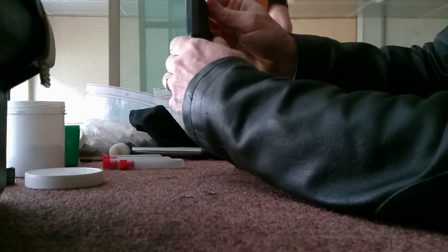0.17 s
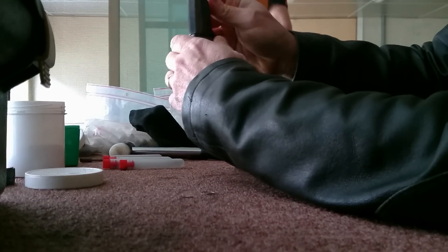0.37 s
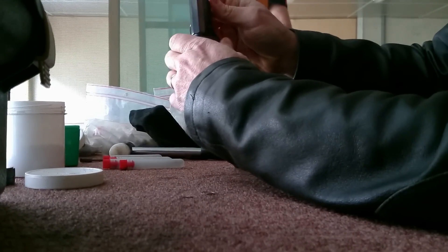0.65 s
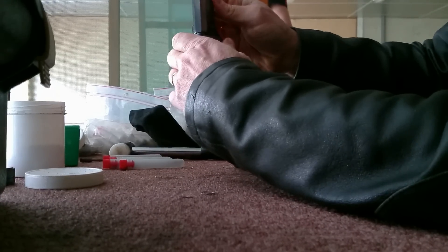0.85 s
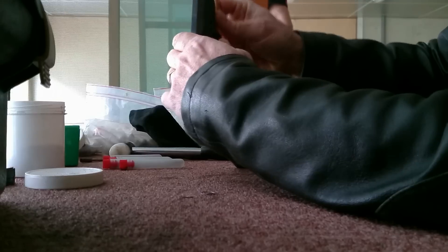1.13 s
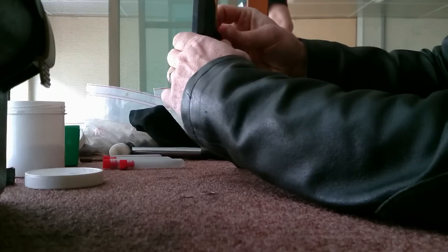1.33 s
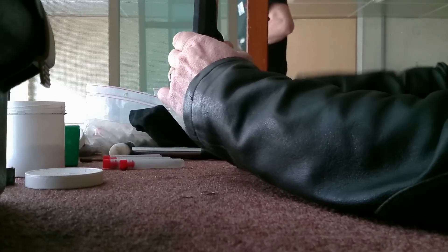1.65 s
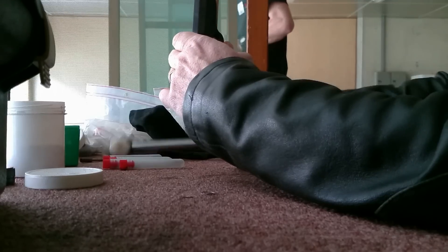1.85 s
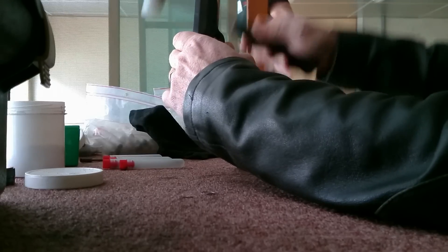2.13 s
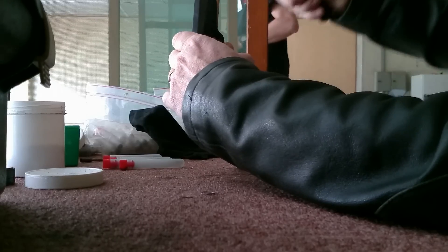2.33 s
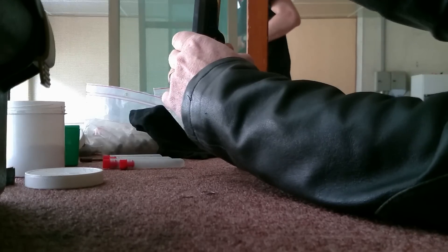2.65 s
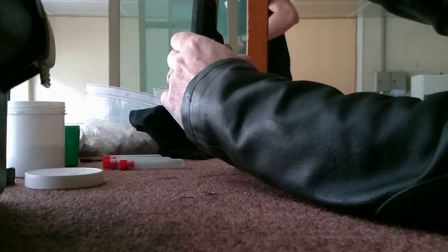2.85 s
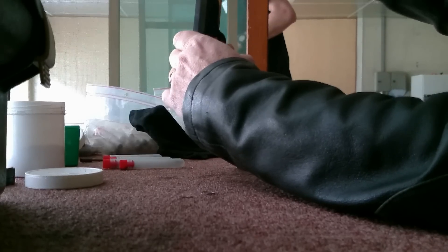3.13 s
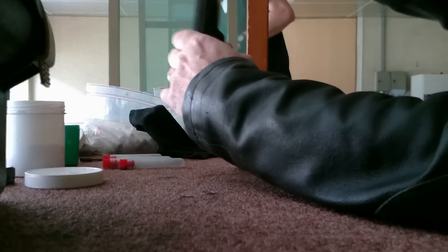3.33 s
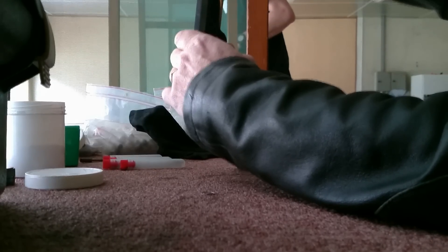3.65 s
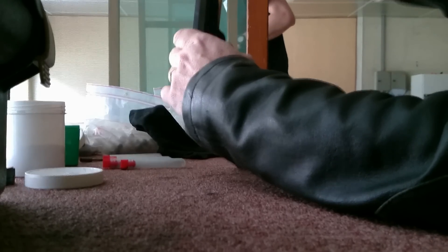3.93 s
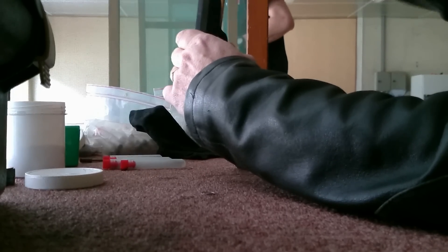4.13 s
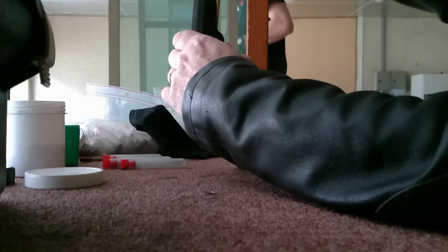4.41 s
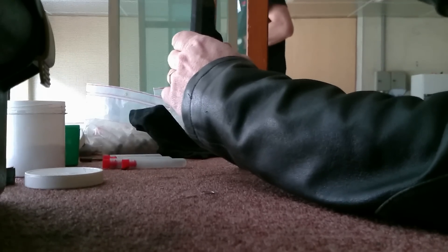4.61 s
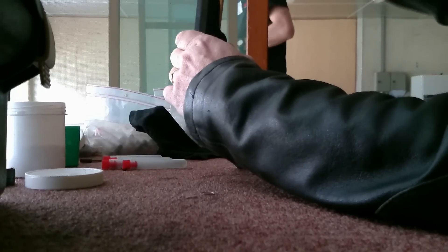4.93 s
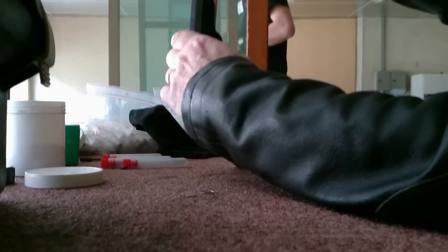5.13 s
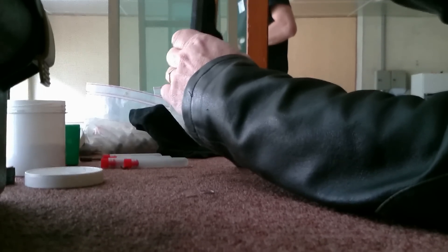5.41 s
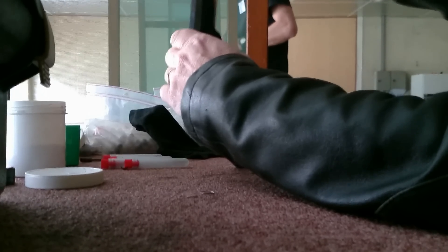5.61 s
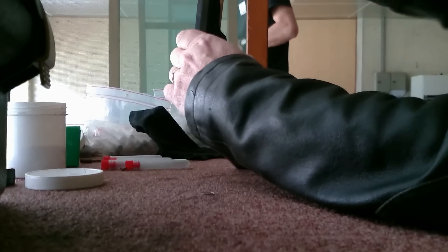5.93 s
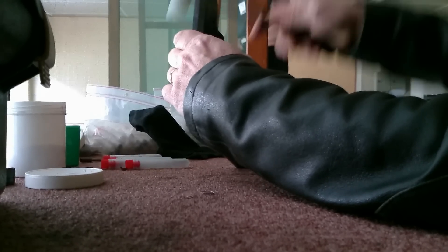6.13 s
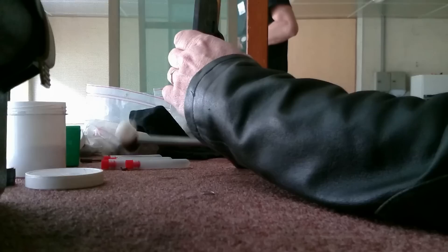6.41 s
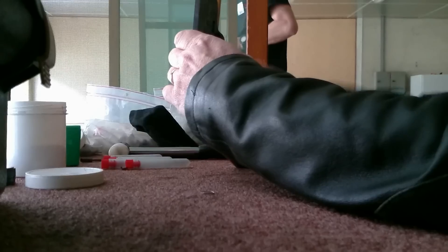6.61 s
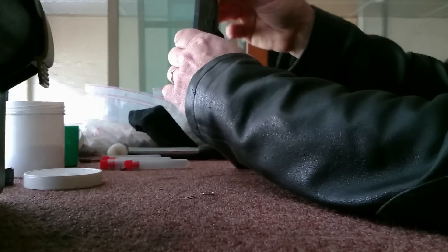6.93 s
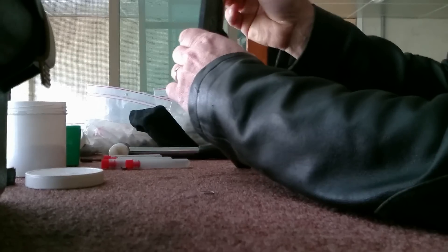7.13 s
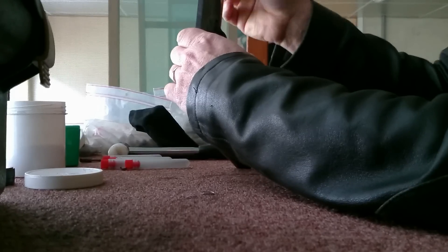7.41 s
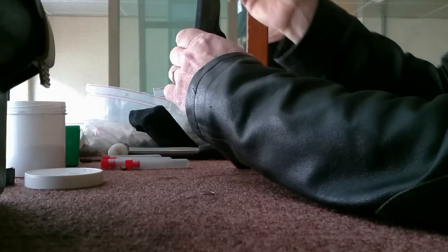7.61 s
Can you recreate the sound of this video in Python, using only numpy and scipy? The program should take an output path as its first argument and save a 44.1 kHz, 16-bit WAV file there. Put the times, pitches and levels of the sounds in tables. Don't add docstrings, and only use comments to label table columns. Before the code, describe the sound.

Close on a carpeted table in a small hard room, hands tick and press a steel firearm part home with a bright clack. After a pause, thirteen quick, even blows crack sharply, growing harder and overloading the microphone, with table thumps and a brief metallic ring. Then a heavy dull thud and faint leather rustle and tiny clicks.

```python
import sys
import numpy as np
from scipy import signal
from scipy.fft import rfft, irfft
from scipy.io import wavfile

SR = 44100
rng = np.random.default_rng(int(sys.argv[2]) if len(sys.argv) > 2 else 0)


def ratio_of_db(decibels):
    return 10 ** (np.asarray(decibels, float) / 20)


def dump(signal):
    limited = np.clip(np.atleast_2d(signal).T, -1, 1)
    pcm = np.round(limited * 32767).astype(np.int16)
    wavfile.write(sys.argv[1], SR, pcm)


N = 342216

# t/s, crack level/dB, table push level/dB, room level/dB, body of the stock level/dB
BLOWS = [(2.7103, -7.5, -20.5, -17.5, -2), (2.9462, -1, -15.5, -14.5, -9), (3.1957, 1.5, -12, -11.5, -9),
         (3.491, 3.5, -8.5, -7.5, -5), (3.7785, 6.5, -4.5, -8, -3.5), (4.058, 9, -5, -9, -1),
         (4.353, -1.5, -3.5, -1.5, 2), (4.6462, 1, -6.5, -7.5, 7), (4.9336, 5.5, -7.5, -12, 6.5),
         (5.1968, 5.5, -4.5, -6.5, 0), (5.445, 10, -4.5, -10, -2), (5.7441, 9.5, -7, -10, -4.5),
         (6.0116, 8.5, -3, -7, -2)]
# lateness of the push/ms, two prominent steel modes f/Hz, f/Hz, their lift level/dB
SEATS = [(-1.5, 7770, 11000, 6), (-1.0, 2080, 8800, 8), (0.0, 2400, 8370, 6), (.3, 5840, 10900, 6),
         (0.0, 6470, 2840, 6), (.2, 5490, 8380, 6), (.75, 2700, 8400, 6), (1.0, 3400, 13800, 10),
         (1.5, 3300, 8800, 4), (.35, 3300, 5800, 5), (.5, 6000, 13800, 8), (1.0, 5800, 8400, 5),
         (0.0, 8300, 5800, 6)]
# f/Hz, width/Hz, level/dB
CRACK_DIPS = [(4200, 3100, -5), (14200, 3200, -7)]
# left delay/ms, right delay/ms, left level/dB, right level/dB
WALLS = [
    (10.3, 11.3, -28, -23),
    (23.6, 23.6, -30, -25),
    (36, 28.8, -33, -29),
    (52, 43.5, -36, -28),
    (66, 63, -33, -31),
]
# f/Hz, level/dB, t60/s
BARREL = [(3160, -57, .45), (3230, -54, .45), (3290, -52.5, .4), (3365, -53.5, .3), (3450, -59, .2)]
# t/s, level/dB
GRIP = [
    (2.7, -25),
    (4.3, -16),
    (4.6, 0),
    (4.95, 2),
    (5.3, -4),
    (5.5, -14),
    (6.1, -20),
]
# t/s, level/dB, f/Hz
HANDLE = [(2.711, -26, 677), (2.946, -14.5, 641), (2.946, -7, 2080), (4.06, -12.5, 1700),
          (4.0595, -13.5, 830), (4.354, -11.5, 860), (5.198, -8, 900), (4.935, -13, 2750),
          (3.197, -9.5, 652), (3.493, -2.5, 2506), (4.354, -9.5, 2687), (4.6475, -5, 3550),
          (4.934, -8, 3320), (5.446, -2, 2600), (5.4455, -1.5, 5940), (5.744, -5.5, 2233),
          (6.011, -1.5, 2023)]
# t/s, level/dB, f/Hz, left-right level/dB
REBOUNDS = [(2.829, -28, 7450, 6), (2.9048, -45, 5600, -2), (3.266, -13.5, 7700, -1.5),
            (3.5257, -8.5, 7900, 9), (4.431, -15.5, 6600, 7), (4.7107, -22.5, 13600, 27),
            (4.726, -9, 8710, 8), (4.658, -21, 11000, 6.5), (2.8305, -41, 2900, 4), (5.4568, -9, 7800, 6),
            (5.0114, -24.5, 8000, 25), (5.4877, -5, 8000, 4), (5.6208, -30.5, 7060, 16),
            (5.663, -35.5, 10520, 11), (5.667, -25, 5000, 5), (5.757, -14.5, 4650, -1),
            (5.7672, -3, 8900, 6)]

# f/Hz, sharp blow level/dB, soft blow level/dB, t60/s
TABLE = [(97.0, 1, -14, 0.16), (114.9, -6.5, -2.5, 0.13), (141.2, -2.5, -5, 0.125),
         (171.5, -8, -10.5, 0.25), (190, -22, -19.5, 0.33), (232, -10.5, -21, .12), (247, -30, -28.5, 0.35),
         (287, -13, -30, 0.14), (327, -3, -28, 0.09), (348, -1, -24, 0.095), (385, -11, -33, .14),
         (423, -12, -35, 0.082), (477, -15.5, -39.5, 0.091), (528.7, -10.5, -39, 0.078),
         (593, -15.5, -35.5, 0.051), (645, -9.5, -32, 0.045), (719.5, -14.5, -26.5, 0.053),
         (801, -6, -31, 0.03), (900, -12, -41.5, 0.028), (1025, -16, -38, 0.026),
         (1092, -16.5, -42.5, 0.03)]
# lateness/ms, level under a weak blow/dB
LOW_MODES = [(0.0, -3.5), (2.0, -7), (1.5, -9), (-.2, -12), (1.5, -33), (-.2, -18), (0.0, -30), (1.2, -21),
             (.2, -17), (0.0, -25), (0.0, -32)]
# t/s, push level/dB, sharpness/0-1
KNOCKS = [(0.189, -45, 0.65), (0.364, -36.5, 0), (0.424, -53, 0), (0.495, -39.5, 0.1), (0.622, -38.5, 0.86),
          (1.515, -38, 0.47), (1.832, -34, 0.46), (6.41, -52, 0.8), (6.6, -37.5, 0.25), (6.631, -29.5, 0.6),
          (6.672, -1, 0), (6.726, -7.5, 0), (6.768, -26.5, 0.2), (6.973, -42, 0.47), (7.177, -36.5, 0.73),
          (7.425, -37, 0.1), (7.472, -39, 0.0)]

# t/s, level/dB, f/Hz, room level/dB
SEATING = [(1.1442, -36.5, 7300, -10.5), (1.1735, -11, 5780, -2), (1.2208, -0.5, 5500, 1.5),
           (1.2248, -7, 6170, -14), (1.2294, -5, 5640, -12), (1.233, -7, 8900, -10),
           (1.2412, 3.5, 6140, -27), (1.2428, 5.5, 5650, -26), (1.251, -7, 5530, -13),
           (1.2623, -7.5, 5830, -20), (1.3745, -9, 5200, -24), (1.3763, -25, 5200, -25),
           (1.3748, -18, 7600, -13), (1.374, -40, 12800, -20), (1.1745, -18, 15200, -10),
           (1.3826, -35, 4900, -3), (1.511, -30, 7600, -30), (1.6104, -25.5, 7500, -24)]
# f/Hz, level/dB, t60/s
SEATED_MODES = [(4737, -3, .16), (4829, -4, 0.18), (5000, -8, .1), (5180, -6, .1), (5717, -13, .2),
                (5895, -12, .25), (6089, -8, .3), (6175, -7, .2), (8200, -10, 0.12), (7736, -11, 0.12)]
# t/s, level/dB, f/Hz, left-right level/dB
TICKS = [(0.259, -43, 5150, 5), (0.3611, -46, 4300, 1), (0.397, -36, 7450, -10), (0.408, -24.5, 9200, -7),
         (0.4222, -28.5, 5560, -6), (0.4324, -32, 7330, -4), (0.546, -39, 7500, -5),
         (0.617, -38.5, 8200, 0), (0.9775, -45.5, 6140, 6), (1.0253, -41.5, 6100, 3),
         (1.7399, -44.5, 5780, -3), (2.024, -37.5, 5600, 4), (2.0812, -39.5, 9400, 5),
         (2.083, -35.5, 4200, 2), (2.096, -45, 5500, 3.5), (2.098, -47, 8200, -5), (2.032, -39, 4460, 2),
         (2.03, -42, 2600, -2), (2.05, -48, 3300, -15), (2.045, -39, 5500, -2), (1.164, -41.5, 11000, 2),
         (6.729, -52, 5700, 5), (2.6299, -43.5, 5300, -13), (6.481, -44, 3950, 5), (7.1719, -44, 4950, -1),
         (7.1885, -31.5, 5940, 10), (7.4082, -64, 5720, -4), (7.4241, -56.5, 8440, -8.5),
         (7.549, -50, 8800, 4), (7.66, -50.5, 5710, -6), (1.165, -34, 7630, 2), (1.598, -52, 7050, -5),
         (7.5214, -46.5, 8400, -3.5), (7.5826, -48.5, 8200, -3), (7.6276, -55.5, 5830, -6),
         (7.695, -46, 5630, -12)]
# t/s, level/dB, f/Hz, left-right level/dB
CLACKS = [(0.422, -50, 900, -6), (.433, -48, 740, 16), (.627, -47, 900, -5), (1.241, -25.5, 1560, -18),
          (1.240, -31, 600, -17), (1.24, -8.5, 8800, 4), (1.512, -47.5, 2330, 0), (6.727, -46, 712, 0),
          (6.848, -58.5, 900, 3.5), (6.87, -58, 1300, -4.5), (6.89, -54, 799, 3), (7.63, -52, 2900, -5.5),
          (7.695, -50, 3000, -5), (7.43, -49.5, 684, 8)]
# t/s, level/dB, f/Hz, length/ms
PUT_DOWN = [(1.809, -37, 794, 12), (1.808, -26.5, 1540, 8.2), (1.81, -28.5, 3340, 6),
            (1.815, -31.5, 1230, 4.9), (1.83, -33, 5900, 2.6), (1.846, -47, 5700, 2.3),
            (1.875, -50, 5300, 3.2), (1.9, -46, 7500, 4), (1.807, -20, 5870, 1.9),
            (1.821, -29.5, 3700, 4.7), (1.8556, -43, 6900, 2)]
# t/s, level/dB, f/Hz, length/ms, left-right level/dB
SCUFFS = [(1.147, -43, 590, 6.1, 7), (1.242, -14.5, 2900, 11.6, -4), (1.377, -44, 5600, 21, -6),
          (1.615, -40.5, 4700, 11.5, -11.5), (1.889, -44.5, 363, 26, 0), (3.419, -46, 702, 11, -4),
          (6.605, -53.5, 2740, 77, 3), (6.63, -52, 5700, 45, 0), (6.61, -56, 950, 31, 7),
          (7.01, -59.5, 5500, 40, 0), (7.2, -56.5, 6800, 22, -3), (7.175, -61, 1300, 16, 0.5),
          (7.179, -48.5, 7860, 16, 3), (7.175, -52.5, 4200, 20, 4), (7.245, -58, 8200, 25, 0),
          (6.6725, -35, 1900, 1.4, -5), (6.6725, -44, 2600, 2.5, -4), (6.673, -29, 750, 2.9, 0),
          (6.971, -51, 250.5, 47, -5), (7.19, -54, 1200, 14, 6), (7.419, -48.5, 190, 37, 8),
          (7.525, -54, 2936, 9.4, 3)]
# f/Hz, level/dB, t60/s
LOOSE_MODES = [(2430, 0, .045), (2600, -2, 0.032), (2900, -3, 0.044), (4300, -3, 0.044), (4900, -0.5, .18),
               (5150, -9, .06), (5650, -3, 0.054), (5800, -14, .07), (7450, -2, 0.035), (8200, -5, .04)]

# from t/s, to t/s, level/dB, fade/s
FINGERS = [(.05, .18, -56, 0.11), (.415, .425, -50.5, 0.029), (1.2, 1.31, -46, 0.054),
           (1.58, 1.63, -63, 0.086), (1.98, 2.09, -59, 0.077), (6.36, 6.41, -57, 0.11),
           (6.6, 6.7, -59, 0.03), (7.0, 7.05, -62, .06), (7.185, 7.195, -56, 0.02),
           (7.24, 7.28, -68, 0.044), (7.64, 7.72, -64, 0.077)]
# from t/s, to t/s, level/dB, fade/s
DRAGS = [
    (.1, .21, -62, 0.22),
    (.38, .49, -60, 0.15),
    (1.17, 1.22, -60.5, 0.15),
    (1.45, 1.62, -63, 0.076),
    (2.8, 6.38, -58.5, 0.092),
    (6.4, 6.48, -57, 0.038),
    (6.61, 6.66, -47, 0.028),
    (6.8, 7.05, -64, 0.12),
    (7.17, 7.24, -60.5, 0.063),
    (7.52, 7.54, -61, 0.074),
]
# f/Hz, level/dB per Hz
CLOTH = [(800, -13), (2500, -1.5), (5000, 1.5), (9000, -7), (15000, -9)]
# f/Hz, level/dB per Hz
SLEEVE = [(100, -3), (250, 0.5), (600, -5.5), (1000, -12), (2000, -24), (5000, -42.5)]
# f/Hz, t60/s, level/dB
ROOM = [(201, 0.29, -1.5), (387, 0.17, 7.5), (700, 0.17, 10.5), (1300, 0.2, 2.5), (3000, 0.36, 3),
        (6440, 0.36, 4), (11000, 0.26, -0.5), (15000, 0.2, -12)]
# f/Hz, level/dB per Hz
AIR = [(30, 3), (50, 9), (80, 3.5), (200, -9), (700, -11.5), (1500, -19.5), (4000, -25.5), (9000, -33),
       (16000, -35)]
# f/Hz, width/Hz, level/dB
PORTS = [
    [(8400, 3000, 8.5), (11300, 700, 7.5), (12940, 540, -29.5), (13800, 630, 7), (4050, 3500, -4.5)],
    [(5780, 1500, 11.5), (3000, 850, 1), (8710, 5000, -11), (13100, 550, -7.5)],
]
# f/Hz, width/Hz, level/dB
LOW_DIP = (48, 28, -7.5)

CRACK_HZ, CRACK_MS, EDGE_DB, STEEL_WIDTH_HZ = 6500, 2.22, -14.5, 500
STOCK_HZ, STOCK_WIDTH_HZ, STOCK_NEAR = 1320, 1200, 0.56
HARD_HZ, SOFT_HZ = 2500, 313
TABLE_LAG_S, BENDING_S, FEET_HZ = 0.00024, 0.0042, 70
ROCKING_MODE = 1
HANDLE_MS, HANDLE_PAN_DB, HANDLE_ROOM_DB = 4.2, -4.5, -19
TICK_MS, TICK_ROOM_DB, REBOUND_ROOM_DB, SEATING_PAN_DB = 1.5, -4, -7, -6
PUT_DOWN_PAN_DB, PUT_DOWN_ROOM_DB = -13, 0.5
CLACK_MS, CLACK_ROOM_DB, SCUFF_ROOM_DB = 3.6, -8.5, -12.5
RATTLE_S, RATTLE_LENGTH_S, RATTLE_DB, RATTLE_PER_S = 7.171, 0.035, -58, 900
SETTLE_S, SETTLE_LENGTH_S, SETTLE_DB = 1.374, 0.0197, -52.5
FADE_DB, FINGERS_REST_DB, SLEEVE_REST_DB = 11.5, -68.5, -87
AIR_DB, WOBBLE_DB, WOBBLE_HZ = -58.5, -32.5, 11.0
SQUEEZE_FROM_DB, SQUEEZE, RELEASE_DB_S = -5, 0.21, 161.5
COUPLING_HZ, CUTOFF_HZ, TOP_HZ = 24.8, 15900, 16900


def rms_one(x):
    return x / np.sqrt(np.mean(x ** 2) + 1e-20)


def at_hz(points, hz, axis=1):
    points = np.array(points)
    return np.interp(np.log(hz), np.log(points[:, 0]), points[:, axis])


def add(out, s, piece):
    i = round(s * SR)
    out[..., i:i + piece.shape[-1]] += piece[..., :N - i]


def ring(x, hz, t60):
    r, w = ratio_of_db(-60 / (t60 * SR)), 2 * np.pi * hz / SR
    return signal.lfilter([0, np.sin(w)], [1, -2 * r * np.cos(w), r * r], x + 1e-18)


def peak(x, hz, width_hz, db):
    w, g = 2 * np.pi * hz / SR, ratio_of_db(db / 2)
    a = np.tan(np.pi * width_hz / SR)
    return signal.lfilter([1 + a * g, -2 * np.cos(w), 1 - a * g], [1 + a / g, -2 * np.cos(w), 1 - a / g], x)


def lowpass(x, order, hz):
    return signal.lfilter(*signal.butter(order, hz, fs=SR), x)


def bandpass(x, order, low_hz, high_hz):
    edges = [low_hz, min(high_hz, 0.44 * SR)]
    return signal.sosfilt(signal.butter(order, edges, "band", fs=SR, output="sos"), x)


def coloured(white, spectrum):
    hz = np.maximum(np.fft.rfftfreq(N, 1 / SR), 10)
    return rms_one(irfft(rfft(white) * ratio_of_db(at_hz(spectrum, hz)), N))


def crack(noise, hz, ms, breadth):
    t = np.arange(noise.shape[-1]) / SR
    chatter = noise * np.exp(-t / (ms / 1000))
    edge = bandpass(chatter, 3, hz / 1.9, hz * 2.4)
    burst = bandpass(chatter, 3, hz / breadth, hz * breadth) + ratio_of_db(EDGE_DB) * edge
    burst = burst / np.abs(burst).max()
    click = 1.0 * (t == 0)
    pulse = bandpass(click, 2, hz / (1.2 * breadth), hz * 1.5 * breadth)
    pulse = pulse * np.sqrt(np.sum(burst[0] ** 2) / np.sum(pulse ** 2))
    return burst, pulse + 0.3 * burst[0]


def barrel(sent):
    free = ratio_of_db(np.interp(np.arange(N) / SR, *np.transpose(GRIP)))
    steel = sum(ratio_of_db(db) * ring(sent * free, hz, t60) for hz, db, t60 in BARREL)
    waver = lowpass(rng.standard_normal(N), 2, 55) + 0.03
    return steel * rms_one(waver)


def blows():
    direct, sent = np.zeros((2, N)), np.zeros(N)
    noise = rng.standard_normal((len(BLOWS), 2, 1500))
    for row, (s, db, _, room_db, stock_db), (_, *modes, lift_db) in zip(noise, BLOWS, SEATS):
        burst, pulse = crack(row[0] + 5.4 * row, CRACK_HZ, CRACK_MS, breadth=4.45)
        burst = peak(burst, STOCK_HZ, STOCK_WIDTH_HZ, STOCK_NEAR * stock_db)
        pulse = peak(pulse, STOCK_HZ, STOCK_WIDTH_HZ, stock_db)
        for hz, width_hz, dip_db in CRACK_DIPS:
            burst = peak(burst, hz, width_hz, dip_db)
        for hz in modes:
            burst = peak(burst, hz, STEEL_WIDTH_HZ, lift_db)
            pulse = peak(pulse, hz, STEEL_WIDTH_HZ, 0.4 * lift_db)
        add(direct, s, ratio_of_db(db + 7.0) * burst)
        for left_ms, right_ms, left_db, right_db in WALLS:
            add(direct[0], s + left_ms / 1000, ratio_of_db(db + room_db + left_db + 18) * burst[1])
            add(direct[1], s + right_ms / 1000, ratio_of_db(db + room_db + right_db + 18) * burst[0])
        scrape = burst[:, ::-1] * rng.choice([-1, 1], 1500)
        add(direct, s - 1500 / SR, ratio_of_db(db - 33.5) * scrape)
        add(sent, s, ratio_of_db(db + 3.8 + room_db) * pulse)
    return direct * ratio_of_db([[1.5], [-1.5]]), sent + barrel(sent)


def table(pushes, pile_hz, low_db, spread_db, far):
    s, db, sharp = np.transpose(pushes)
    spread = rng.normal(0, spread_db, (len(s), len(TABLE)))
    out = np.zeros((2, N))
    for k, (hz, sharp_db, soft_db, t60) in enumerate(TABLE):
        late, uneven = 0, 2.5
        if k < len(LOW_MODES):
            soft_db, late, uneven = low_db[k], far * LOW_MODES[k][0] / 1000, 1
        mode_db = soft_db + np.clip(sharp, -0.5, 1) * (sharp_db - soft_db)
        way = np.where((sharp > 0.5) & (k == ROCKING_MODE), -1, 1)
        arrival = s + late + BENDING_S * np.sqrt(100 / hz)
        force = np.zeros(N)
        force[(arrival * SR).astype(int)] = way * ratio_of_db(db + mode_db + spread[:, k] * uneven)
        sign = 1 if hz < 205 else -1 if hz < 450 else (-1) ** k
        balance_db = [[1.5], [-1.5]] if k % 3 else [[-0.4], [0.4]]
        out -= sign * ring(force, hz, t60) * ratio_of_db(balance_db)
    out[1] = np.interp(np.arange(N) - TABLE_LAG_S * SR, np.arange(N), out[1])
    out = lowpass(out, 2, pile_hz)
    return signal.lfilter(*signal.butter(2, FEET_HZ, "high", fs=SR), out)


def contacts(rows, trim_db, breadth):
    direct, sent = np.zeros((2, N)), np.zeros(N)
    noise = rng.standard_normal((len(rows), 2, 3000))
    for row, (s, db, hz, ms, pan_db, room_db) in zip(noise, rows):
        burst, pulse = crack(row[0] + 0.63 * row, hz, ms, breadth)
        add(direct, s, ratio_of_db(db + trim_db) * burst * ratio_of_db([[pan_db / 2], [-pan_db / 2]]))
        add(sent, s, ratio_of_db(db + trim_db + room_db) * pulse)
    return direct, sent


def steel_ticks():
    rebounds = [(s, db, hz, TICK_MS, pan, REBOUND_ROOM_DB) for s, db, hz, pan in REBOUNDS]
    seating = [(s, db, hz, TICK_MS, SEATING_PAN_DB, room_db) for s, db, hz, room_db in SEATING]
    fingers = [(s, db, hz, TICK_MS, pan, TICK_ROOM_DB) for s, db, hz, pan in TICKS]
    return rebounds + seating + fingers


def dull_clacks():
    handle = [(s, db, hz, HANDLE_MS, HANDLE_PAN_DB, HANDLE_ROOM_DB) for s, db, hz in HANDLE]
    put_down = [(*row, PUT_DOWN_PAN_DB, PUT_DOWN_ROOM_DB) for row in PUT_DOWN]
    clacks = [(s, db, hz, CLACK_MS, pan, CLACK_ROOM_DB) for s, db, hz, pan in CLACKS]
    scuffs = [(*row, SCUFF_ROOM_DB) for row in SCUFFS]
    return handle + put_down + clacks + scuffs


def rattle(modes, start, length, level_db):
    t = np.arange(N) / SR - start
    touches = (rng.random(N) < RATTLE_PER_S / SR) * (t > 0) * (t < length)
    out = np.zeros((2, N))
    for hz, db, t60 in modes:
        out += ratio_of_db(db) * ring(touches * rng.standard_normal((2, N)), hz, t60)
    return ratio_of_db(level_db) * out


def strokes(rows, rest_db):
    t, gain = np.arange(N) / SR, ratio_of_db(rest_db)
    for start, end, db, fade in rows:
        outside = np.maximum(np.maximum(start - t, t - end), 0)
        gain = np.maximum(gain, ratio_of_db(db - FADE_DB * outside / fade))
    return gain


def rub(gain, spectrum):
    slip_db = 3.0 * np.minimum(rng.exponential(1, N), 5)
    return gain * coloured(rng.standard_normal((2, N)) * ratio_of_db(slip_db), spectrum)


def rustle():
    fingers = rub(strokes(FINGERS, FINGERS_REST_DB), CLOTH)
    return fingers + rub(strokes(DRAGS, SLEEVE_REST_DB), SLEEVE)


def room(x):
    t = np.arange(SR // 2) / SR
    white, tail = rng.standard_normal((2, 2, len(t))), 0
    edges = 150 * 2 ** np.arange(0, 7.1, 0.5)
    for k, (low, high) in enumerate(zip(edges, edges[1:])):
        hz = np.sqrt(low * high)
        band = signal.sosfilt(signal.butter(2, [low, high], "band", fs=SR, output="sos"), white[k % 2])
        tail = tail + band * ratio_of_db(at_hz(ROOM, hz, axis=2) - 60 * t / at_hz(ROOM, hz))
    tail = tail * (1 - np.exp(-np.maximum(t - 0.002, 0) / 0.00033))
    tail = tail / np.sqrt(np.sum(tail ** 2) / 2)
    return signal.fftconvolve(x[None], tail, axes=1)[:, :N]


def wobble(pushes):
    kicks = np.zeros(N)
    kicks[[round(p[0] * SR) for p in pushes]] = [ratio_of_db(p[1] - 12.0) for p in pushes]
    sway = rms_one(ring(rng.standard_normal(N + SR), WOBBLE_HZ, 3.1)[SR:])
    rumble = rms_one(lowpass(rng.standard_normal(N + SR), 2, 35)[SR:])
    steady = ratio_of_db(WOBBLE_DB) * (sway + ratio_of_db(-17) * rumble)
    return (steady + ring(kicks, WOBBLE_HZ, 1.0)) * ratio_of_db([[-22], [0]])


def still_air():
    return ratio_of_db(AIR_DB) * coloured(rng.standard_normal((2, N)), AIR)


def scene():
    hit, hit_sent = blows()
    pushes = [(s + seat[0] / 1000, db + 10.5, (db + 16.0) / 10.0)
              for (s, _, db, *_), seat in zip(BLOWS, SEATS)]
    knocks = [(s, db - 4.0, sharp) for s, db, sharp in KNOCKS]
    weak_db, soft_db = [m[-1] for m in LOW_MODES], [m[-2] for m in TABLE]
    top = table(pushes, HARD_HZ, weak_db, spread_db=1.1, far=1)
    top = top + table(knocks, SOFT_HZ, soft_db, spread_db=1.2, far=0)
    tick, tick_sent = contacts(steel_ticks(), trim_db=-2.0, breadth=1.25)
    clack, clack_sent = contacts(dull_clacks(), trim_db=2.0, breadth=1.3)
    loose = rattle(LOOSE_MODES, RATTLE_S, RATTLE_LENGTH_S, RATTLE_DB)
    seated = rattle(SEATED_MODES, SETTLE_S, SETTLE_LENGTH_S, SETTLE_DB)
    tail = room(hit_sent + ratio_of_db(-6.0) * tick_sent + clack_sent + ratio_of_db(-13) * top[0])
    handling = tick + clack + loose + seated + rustle()
    return hit + top + handling + tail + wobble(pushes + knocks) + still_air()


def gain_control(x):
    fall = RELEASE_DB_S * np.arange(N) / SR
    over = np.maximum(20 * np.log10(np.abs(x).max(0) + 1e-9) - SQUEEZE_FROM_DB, 0)
    held = np.maximum.accumulate(over + fall) - fall
    attack = np.exp(-1 / (0.0035 * SR))
    return x * ratio_of_db(-SQUEEZE * signal.lfilter([1 - attack], [1, -attack], held))


def roll_off(x):
    return signal.sosfilt(signal.butter(12, 17140, fs=SR, output="sos"), x)


def record(dry):
    x = dry.copy()
    for side, port in enumerate(PORTS):
        for hz, width_hz, db in port:
            x[side] = peak(x[side], hz, width_hz, db)
    x = gain_control(x)
    x = x / (1 + (np.abs(x) / 0.82) ** 5.7) ** (1 / 4.7)
    x = peak(x, *LOW_DIP)
    x = signal.lfilter(*signal.butter(1, COUPLING_HZ, "high", fs=SR), x)
    x = signal.sosfilt(signal.butter(8, CUTOFF_HZ, fs=SR, output="sos"), x)
    x = np.clip(x, -0.8, 0.8)
    x = signal.sosfilt(signal.cheby2(10, 60, TOP_HZ, fs=SR, output="sos"), x)
    return roll_off(np.clip(x, -1, 1))


dry = scene()
out = record(dry)
dump(out)
```